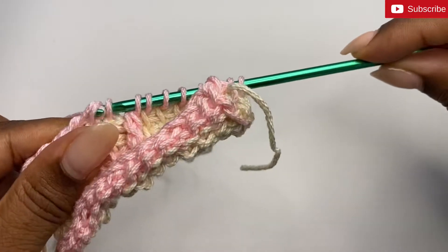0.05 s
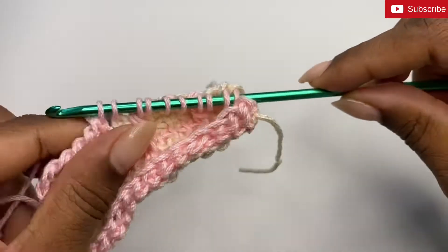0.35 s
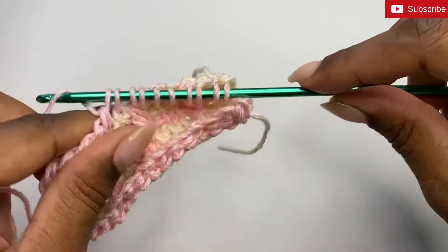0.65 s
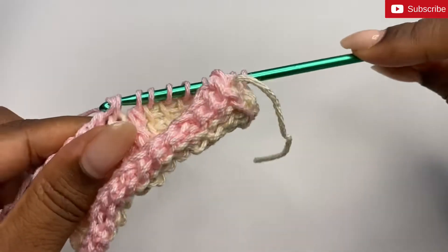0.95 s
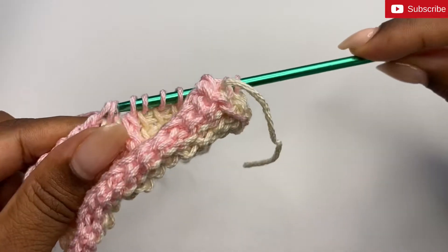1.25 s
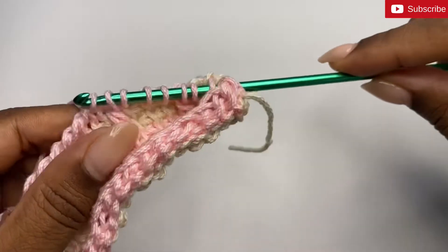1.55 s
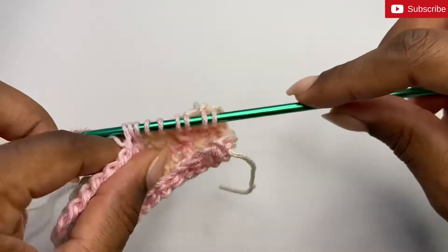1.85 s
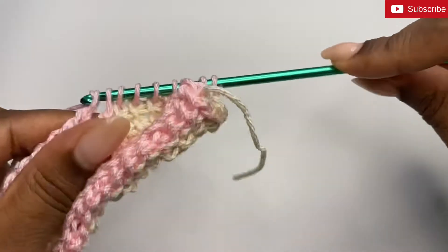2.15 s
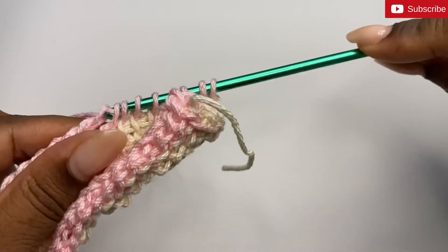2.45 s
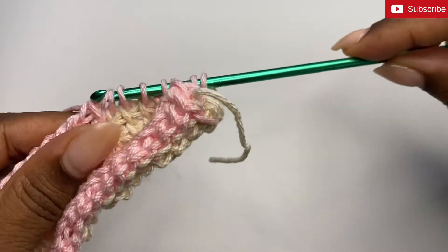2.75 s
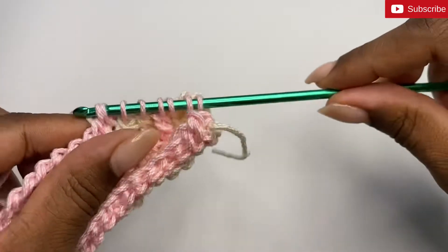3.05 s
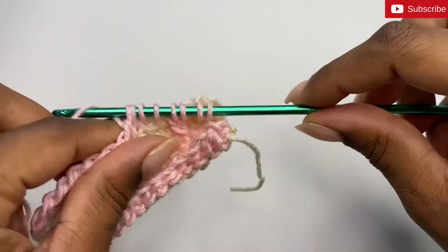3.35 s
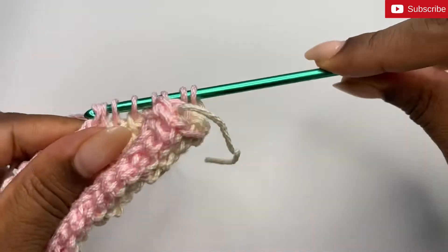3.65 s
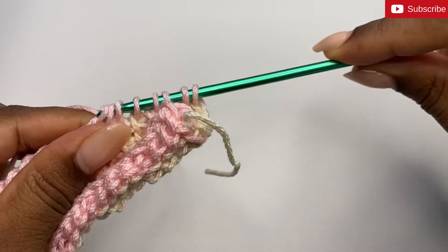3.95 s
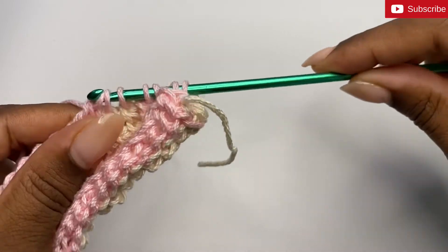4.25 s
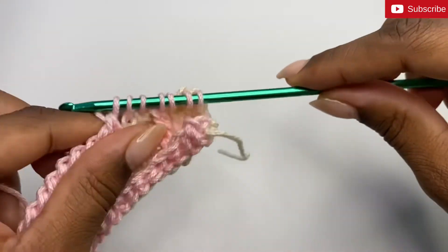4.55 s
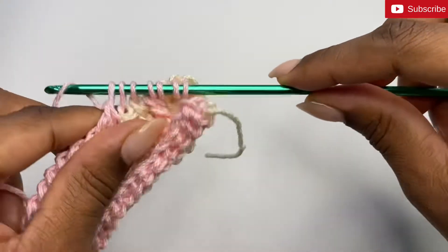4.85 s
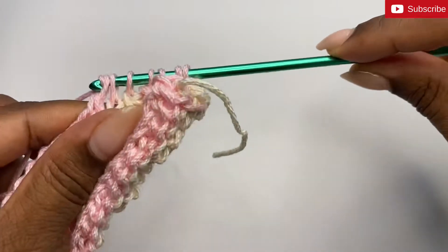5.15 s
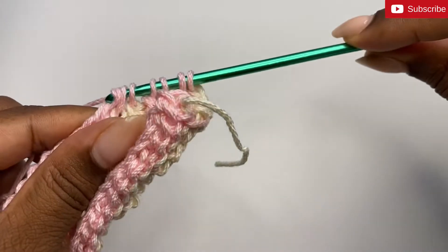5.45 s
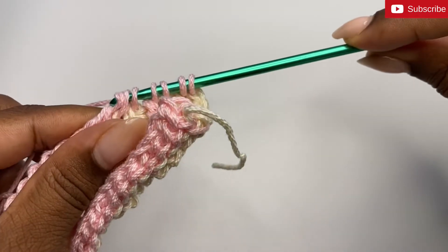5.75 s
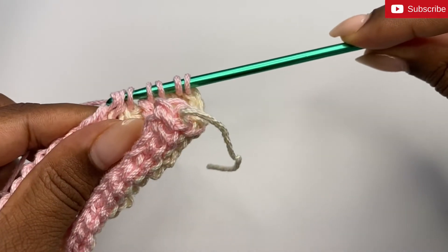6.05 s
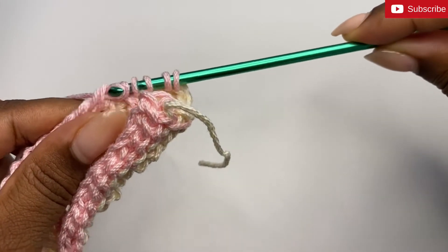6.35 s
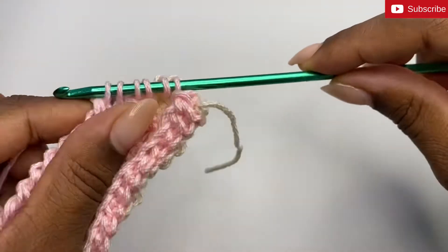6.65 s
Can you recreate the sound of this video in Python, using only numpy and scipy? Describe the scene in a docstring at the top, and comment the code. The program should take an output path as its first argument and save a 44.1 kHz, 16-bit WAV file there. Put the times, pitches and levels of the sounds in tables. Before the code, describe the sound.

Thin, squeaky bird-like chirps come in short phrases over a low room hum, as a distant vehicle pulls away and a crochet hook faintly scuffs.

```python
"""A low hum fills a quiet room. Thin squeaky chirps, most like small birds outside, come in short
phrases of swept tones: a rising tsip, a lower buzzy tsee and a quick run of ticks, twice joined by a
longer, rougher squeal. A distant vehicle pulls away, its engine harmonics filtered by the walls and
its road noise growing. Close by, a crochet hook scuffs softly and taps once; each pull wafts air."""
import sys
import numpy as np
from scipy import signal
from scipy.fft import rfft, irfft, next_fast_len
from scipy.io import wavfile
from scipy.ndimage import map_coordinates

SR = 44100
rng = np.random.default_rng(int(sys.argv[2]) if len(sys.argv) > 2 else 0)


def dump_mix(stems):
    """Bounce the given channels to the path in sys.argv[1] as a 16-bit WAV at rate SR."""
    frames = np.atleast_2d(stems).T  # one column per channel
    limited = np.clip(frames, -1, 1)  # hard clip at full scale
    pcm = np.round(limited * 32767).astype(np.int16)
    wavfile.write(sys.argv[1], SR, pcm)


N = 295646


def amp(db):
    """Decibels to amplitude ratio."""
    return 10 ** (np.asarray(db) / 20)


def unit(x):
    """Normalisation to rms 1."""
    return x / np.sqrt(np.mean(x ** 2) + 1e-20)


def curves(rows, size=N):
    """Linear interpolation in time: one value per sample for each column after the first."""
    times, *columns = np.transpose(rows)
    return [np.interp(np.arange(size) / SR, times, column) for column in columns]


def along(points, hz):
    """Interpolation of (Hz, value) points on a logarithmic frequency axis."""
    freqs, values = np.transpose(points)
    return np.interp(np.log(hz + 1), np.log(freqs), values)


def wobble(rate, size=N):
    """Smooth random modulation, rate knots a second."""
    knots = rng.standard_normal(int(size * rate / SR) + 4)
    return map_coordinates(knots, [np.arange(size) * rate / SR])


def filtered(x, response):
    """Linear filtering: the spectrum is multiplied by a frequency response."""
    size = next_fast_len(N + SR // 2)
    return irfft(rfft(x, size) * response(np.fft.rfftfreq(size, 1 / SR)), size)[:N]


def noise(spectrum):
    """White noise shaped to a (Hz, dB) spectrum, rms 1."""
    return unit(filtered(rng.standard_normal(N), lambda hz: amp(along(spectrum, hz))))


def swell(length_s, spectrum):
    """A puff of noise under a Hann envelope, rms 1."""
    size = int(length_s * SR)
    return unit(np.hanning(size) * noise(spectrum)[:size])


def tone(hz):
    """A sine of rms 1 whose phase is the integral of frequency."""
    return np.sqrt(2) * np.sin(2 * np.pi * (np.cumsum(hz) / SR + rng.random()))


def add(track, start_s, sound):
    """Superposition of a sound on the track."""
    part = track[max(round(start_s * SR), 0):][:len(sound)]
    part += sound[:len(part)]


# An appliance's hum. Each row: frequency in Hz, level in dB.
HUM_PARTIALS = [(138.5, -69.5), (276, -80.5), (414, -83), (551, -84)]
# Steady noises. Each row: frequency in Hz, relative spectral density in dB.
RUMBLE_SPECTRUM = [(3, -8), (8, 11), (14, 3), (22, -4), (32, -2), (42, -16), (65, -13), (85, -29),
                   (300, -120)]
ROOM_SPECTRUM = [(50, -18), (85, -4), (110, -2.5), (160, 1), (220, -3), (300, -10), (520, -10),
                 (640, -14.5), (780, -18.5), (920, -17.5), (1050, -20.5), (1300, -22), (1600, -22.5),
                 (5000, -73)]
HISS_SPECTRUM = [(1000, -16), (2000, 1), (3000, -0.5), (3800, 2), (4600, -3), (5600, -6.5), (7500, -8.5),
                 (11000, -10), (14000, -12), (15000, -18.5)]

def background():
    """The noise floor: hum partials drift together over building rumble, room tone and hiss."""
    drift = 1 + 0.0021 * wobble(4)
    hum = sum(amp(db + 0.37 * wobble(4)) * tone(hz * drift) for hz, db in HUM_PARTIALS)
    rumble = amp(-46.5) * noise(RUMBLE_SPECTRUM)
    return hum + rumble + amp(-69) * noise(ROOM_SPECTRUM) + amp(-80.5) * noise(HISS_SPECTRUM)


def throttle(firing_hz, full_hz_per_s=39, lift_off=-2.5, lag_s=0.099):
    """First-order lag: the load follows a throttle that opens as revs rise and shuts as they fall."""
    pedal = np.clip(np.gradient(firing_hz) * SR / full_hz_per_s, lift_off, 1)
    pole = np.exp(-1 / (lag_s * SR))
    return signal.lfilter([1 - pole], [1, -pole], pedal)


# Engine speed through the gears. Each row: time in seconds, firing rate in Hz.
ENGINE_REVS = [(0.0, 58.8), (1.7, 61.7), (2.05, 68.25), (2.45, 70.64), (3.05, 67.66), (3.27, 69.6),
               (3.52, 48.86), (3.9, 71.8), (4.2, 75.87), (4.65, 76.92), (5.1, 67.9), (5.4, 59.02),
               (6.1, 52.29), (6.7, 48.4)]
# What the walls let in. Each row: frequency in Hz, gain in dB.
WALL_TRANSMISSION = [(45, -9), (61, 2.5), (70, -1), (74, -7), (78, -23.5), (100, -31), (128, -21.5),
                     (148, -14.5), (175, -24.5), (200, -22.5), (228, -16.5), (260, -27.5), (460, -41.5),
                     (700, -36), (900, -38), (1050, -56)]

def engine(road_db, near_db=-65.5, over_road_db=14.5, throttle_db=5.5, bark_db=3):
    """Harmonics of the firing rate slide through wall resonances, louder and brighter under load."""
    firing_hz, = curves(ENGINE_REVS)
    load = throttle(firing_hz)
    cover_db, = curves([(0, -8), (1.3, 0)])  # the vehicle comes out from behind cover
    approach_db = near_db + 0.88 * (road_db - near_db)  # grows a little less than the road noise
    level_db = approach_db + over_road_db + throttle_db * load + cover_db
    firing_hz = firing_hz * (1 + .003 * wobble(10))
    sound = np.zeros(N)
    for order in range(1, 14):
        hz = order * firing_hz
        db = level_db + bark_db * load * (order > 1) + along(WALL_TRANSMISSION, hz)
        gain = amp(db + 1.4 * wobble(7) + wobble(22))
        blur = 1 + .004 * order * wobble(40)  # uneven firing blurs the higher orders most
        sound += gain * tone(hz * blur)
    return sound


# Road noise as the vehicle nears. Each row: time in seconds, level in dB.
ROAD_LEVELS = [(0, -92.5), (1.3, -77.5), (2.2, -74.5), (3.4, -72.5), (3.9, -67.5), (4.7, -65), (5.3, -63.5),
               (6.7, -64)]
# Window resonances. Each row: centre in Hz, width in Hz, peak gain in dB.
PANE_MODES = [(132, 14, 3.5), (225, 11, 11), (256, 22, 7), (347, 26, 6), (485, 42, 3), (619, 44, 2),
              (869, 140, 10.5), (1248, 130, 7)]
# A low boom from the road. Each row: peak time in seconds, length in seconds, rms level in dB.
ROAD_BOOMS = [(5.919, .4, -43)]
# Road noise and boom. Each row: frequency in Hz, relative spectral density in dB.
ROAD_SPECTRUM = [(50, -29), (85, 4.5), (130, 0), (180, -6), (300, -10.5), (450, -7), (600, -17.5),
                 (780, -23), (1000, -20), (1400, -24.5), (2200, -28.5), (3200, -41), (8000, -120)]
BOOM_SPECTRUM = [(10, -31), (19, 14.5), (29, 15), (45, -24), (100, -62), (250, -140)]

def vehicle():
    """Resonant transmission: the panes colour the road's roar, which a boom and the engine join."""
    def panes(hz):
        return amp(sum(db / (1 + (2 * (hz - centre) / width) ** 2) for centre, width, db in PANE_MODES))

    road_db, = curves(ROAD_LEVELS)
    road = amp(road_db + 0.46 * wobble(5.6)) * unit(filtered(noise(ROAD_SPECTRUM), panes))
    for peak, length, db in ROAD_BOOMS:
        add(road, peak - length / 2, amp(db) * swell(length, BOOM_SPECTRUM))
    return engine(road_db) + road


# Pulls of the hook. Each row: peak time in seconds, rms level in dB.
HOOK_PULLS = [(0.518, -42.5), (1.93, -40.5), (3.371, -52.5), (4.731, -42.5), (6.43, -48.5)]
# Moving air. Each row: frequency in Hz, relative spectral density in dB.
WAFT_SPECTRUM = [(2, -14), (7, 8.5), (13, -5), (25, -34.5), (60, -50.5), (200, -140)]

def wafts(length_s=.45):
    """Air displacement: with each pull the hands push a soft, very deep bump at the microphone."""
    track = np.zeros(N)
    for peak, db in HOOK_PULLS:
        add(track, peak - length_s / 2, amp(db) * swell(length_s, WAFT_SPECTRUM))
    return track


# Scuffs. Each row: peak time in seconds, length in seconds, centre in Hz, rms level in dB.
YARN_SCUFFS = [(1.73, 0.023, 1640, -78.5), (2.09, 0.032, 1140, -77.5), (5.985, .05, 1392, -74.5),
               (6.438, 0.026, 1093, -72.5), (6.656, 0.062, 8000, -89)]

def scuffs():
    """Friction: yarn and fingers brush along the hook in brief bands of noise."""
    track = np.zeros(N)
    for peak, length, hz, db in YARN_SCUFFS:
        band = [(hz / 4, -40), (hz / 2.6, -12), (hz, 0), (hz * 1.5, -12), (hz * 4, -40)]
        add(track, peak - length / 2, amp(db) * swell(length, band))
    return track


# One knock. Each row: time since contact in seconds, frequency in Hz, relative level in dB.
KNOCK_CONTOUR = [(0, 1780, -16), (.001, 1090, -3), (.0025, 640, -5), (.006, 800, -19), (.02, 754, -49)]
# Contact of the hook. Each row: start in seconds, level in dB.
HOOK_TAPS = [(5.3909, -46)]

def tap():
    """Damped impact: the hook bumps a fingertip, and the dull knock drops in pitch and dies at once."""
    track = np.zeros(N)
    hz, contour_db = curves(KNOCK_CONTOUR, size=int(KNOCK_CONTOUR[-1][0] * SR))
    for start, db in HOOK_TAPS:
        add(track, start, amp(db + contour_db) * np.sin(2 * np.pi * np.cumsum(hz) / SR))
    return track


# One tick. Each row: time since onset in seconds, pitch in Hz, relative level in dB.
TICK_CONTOUR = [(0, 4070, -14.5), (.004, 4720, -6.5), (.008, 5060, -4.5), (.010, 5740, -7.5),
                (.0125, 6400, -11.5), (.017, 6800, -19)]

def tick(tilt_db, octave_db=-17, rasp=.045):
    """Random frequency modulation roughens a fast upward sweep; positive tilt favours its top."""
    size = int(TICK_CONTOUR[-1][0] * SR)
    hz, db = curves(TICK_CONTOUR, size=size)
    climb = np.clip((hz - 4900) / 900, 0, 1)
    detune = 0.017 * rng.standard_normal()
    hz = hz * (1 + detune + rasp * (.15 + climb) * wobble(1500, size=size))
    envelope = amp(db + tilt_db * climb - max(tilt_db, 0)) * signal.windows.tukey(size, .15)
    return envelope * (tone(hz) + amp(octave_db + 7.6 * climb) * tone(2 * hz))


def tick_run(count, first_gap_s, first_tilt_db, last_tilt_db, settled_gap_s=.0285):
    """A pulse train slows geometrically towards a settled gap while its tilt slides."""
    track, start = np.zeros(SR // 4), 0
    for k, tilt_db in enumerate(np.linspace(first_tilt_db, last_tilt_db, count)):
        add(track, start, amp(-1 if k == 0 else 0) * tick(tilt_db))
        start += settled_gap_s + (first_gap_s - settled_gap_s) * 0.37 ** k
    return track


# How well a whistle's octave radiates. Each row: frequency in Hz, gain in dB.
OCTAVE_RADIATION = [(8500, 0), (10700, -11), (11700, 4), (12700, 5), (14000, -4)]

def whistle(contour, ratio, octave_db, flutter, waver, flutter_hz=260):
    """Frequency modulation: periodic flutter and random waver add sidebands to a sweep and its octave."""
    size = int(contour[-1][0] * SR)
    hz, db = curves(contour, size=size)
    hz = hz * ratio * (1 + flutter * tone(np.full(size, flutter_hz)) + waver * wobble(500, size=size))
    octave = amp(octave_db + along(OCTAVE_RADIATION, 2 * hz)) * tone(2 * hz)
    return amp(db) * signal.windows.tukey(size, .12) * (tone(hz) + octave)


# Note shapes. Each row: time since onset in seconds, untransposed pitch in Hz, relative level in dB.
TSIP_CONTOUR = [(0, 4670, -21), (.007, 5370, -12), (.014, 5820, -12), (.021, 6290, -1.5), (.028, 6330, -11),
                (.036, 6330, -9.5)]
TSEE_CONTOUR = [(0, 4180, -2), (.005, 4700, -0.5), (.011, 5420, 3.5), (.02, 5690, 2.5), (.031, 6060, 3.5),
                (.052, 6010, -4)]
PEEP_CONTOUR = [(0, 4220, -9), (.006, 4950, -6), (.013, 5500, -3), (.026, 5600, -7)]
SQUEAL_CONTOUR = [(0, 5510, -5), (.011, 6210, 3.5), (.04, 6300, 4), (.06, 6230, -2), (.078, 6450, -2),
                  (.103, 6370, 9)]
SHRIEK_CONTOUR = [(0, 5670, -14), (.007, 6630, 5.5), (.018, 6680, 0), (.028, 6250, 1), (.05, 6420, -3),
                  (.064, 6450, -3), (.078, 6270, 4), (.09, 6300, -16)]
# A tsip and its answering tsee. Each row: start in seconds, level in dB, tsip's octave gain in dB,
# tsee's delay in seconds.
CALL_PAIRS = [(1.041, -63, -17.5, .097), (2.103, -64, -15, .103), (2.928, -62.5, -16.5, .100),
              (4.225, -63, -26, 0.11), (5.957, -63.5, -21, .104)]
# Single notes. Each row: start in seconds, level in dB, pitch ratio, octave gain in dB.
PEEP_NOTES = [(4.672, -75, 0.93, -18), (4.837, -69, 1.13, -15), (4.977, -73.5, 0.98, -26)]
SQUEAL_NOTES = [(4.554, -73, 0.98, -23)]
SHRIEK_NOTES = [(3.076, -71, 0.98, -24)]
# Runs of ticks. Each row: start in seconds, count, first gap in seconds, level in dB,
# first and last tilt in dB.
TICK_RUNS = [(.015, 3, 0.018, -67.5, 2, -4), (1.210, 4, 0.019, -66.5, 5, -8),
             (2.273, 4, .020, -67.5, 5, -8), (3.113, 3, 0.024, -66.5, 1, 3), (3.183, 3, 0.025, -65, 4, 15),
             (4.401, 4, .020, -66.5, 3, -10), (4.700, 2, 0.024, -67, 12, 17),
             (4.865, 4, 0.023, -64.5, 2, -10), (6.131, 4, 0.021, -68.5, 4, -6)]

def chirps():
    """Roughness grows with modulation depth: swept notes range from clean tsip to rough shriek."""
    song = np.zeros(N)
    for start, db, octave_db, delay in CALL_PAIRS:
        tsip = whistle(TSIP_CONTOUR, 0.98, octave_db, flutter=0.0064, waver=0.0058)
        tsee = whistle(TSEE_CONTOUR, 0.97, octave_db=-12.5, flutter=0.028, waver=0.014)
        add(song, start, amp(db) * tsip)
        add(song, start + delay, amp(db - 15.5) * tsee)
    for notes, contour, flutter, waver in [(PEEP_NOTES, PEEP_CONTOUR, 0.014, 0.01),
                                           (SQUEAL_NOTES, SQUEAL_CONTOUR, 0.021, 0.018),
                                           (SHRIEK_NOTES, SHRIEK_CONTOUR, 0.028, 0.022)]:
        for start, db, ratio, octave_db in notes:
            add(song, start, amp(db) * whistle(contour, ratio, octave_db, flutter, waver))
    for start, count, gap, db, first_tilt_db, last_tilt_db in TICK_RUNS:
        add(song, start, amp(db) * tick_run(round(count), gap, first_tilt_db, last_tilt_db))
    return song


def room(x, t60, early_db, late_db, treble_db):
    """Reverberation: early reflections and a tail follow the direct sound; the walls absorb treble."""
    size = SR // 2
    t = np.arange(size) / SR
    decays = [amp(-60 * t / life) * (1 - np.exp(-t / 0.0026)) for life in (.09, t60)]
    envelopes = [amp(db) * decay / np.linalg.norm(decay) for db, decay in zip((early_db, late_db), decays)]
    wet = np.zeros(N)
    for start in range(0, N, size):  # a new impulse response each half second
        response = sum(envelope * rng.standard_normal(size) for envelope in envelopes)
        add(wet, start / SR, signal.fftconvolve(x[start:start + size], response))
    return x + filtered(wet, lambda hz: amp(along([(7000, 0.017), (11000, treble_db)], hz)))


def scene():
    """Reverberation marks distance: echoing chirps and nearly dry handwork over traffic and hum."""
    far = room(chirps(), t60=0.36, early_db=-3, late_db=-2, treble_db=-4.5)
    near = room(tap() + scuffs(), t60=.25, early_db=-12, late_db=-21, treble_db=-7)
    return (far + near + wafts() + vehicle() + background())[None]


def record(dry):
    """Band limiting: the microphone cuts off steeply above 15 kHz."""
    return signal.sosfiltfilt(signal.butter(16, 15000, fs=SR, output="sos"), dry)


dry = scene()
out = record(dry)
dump_mix(out)
```